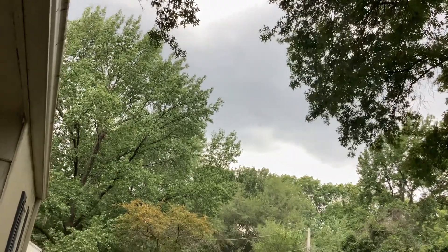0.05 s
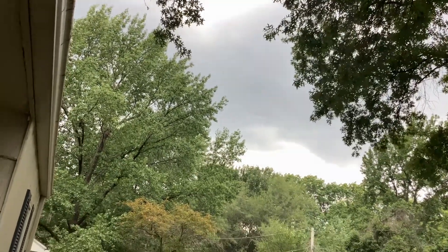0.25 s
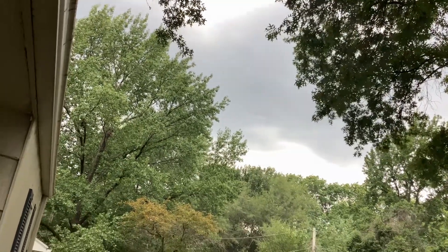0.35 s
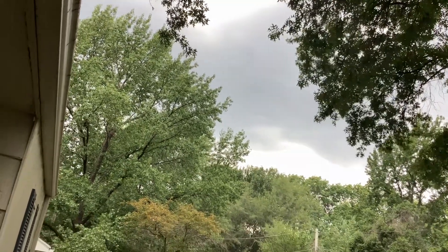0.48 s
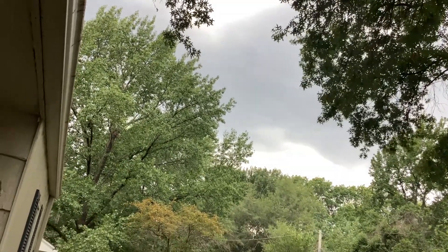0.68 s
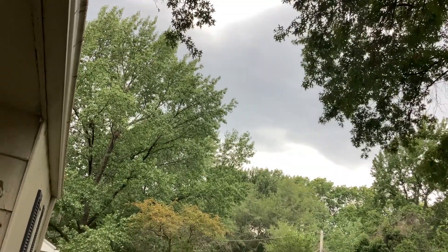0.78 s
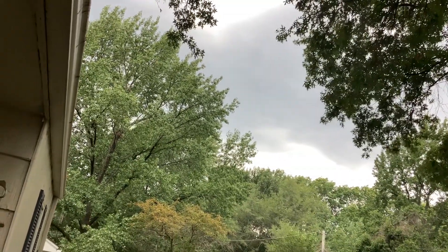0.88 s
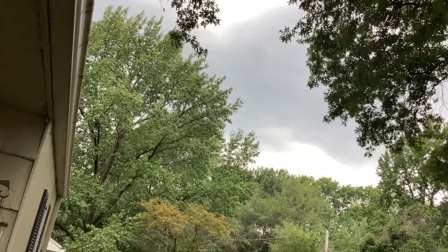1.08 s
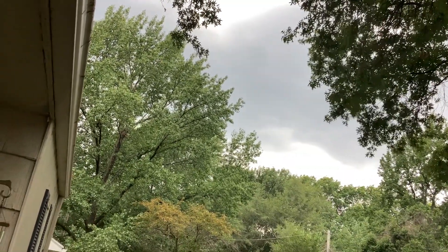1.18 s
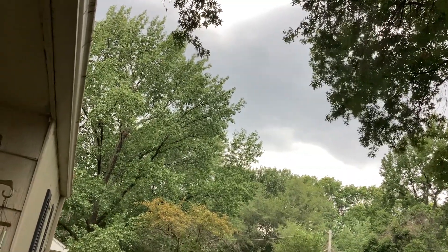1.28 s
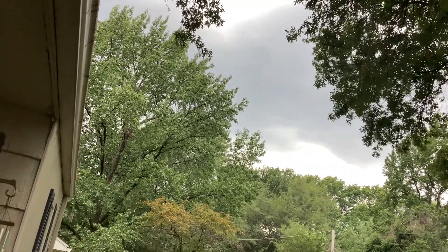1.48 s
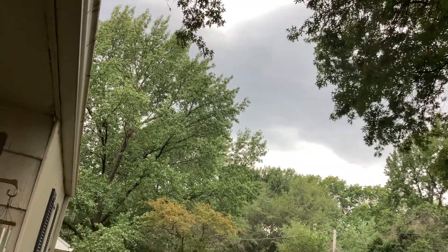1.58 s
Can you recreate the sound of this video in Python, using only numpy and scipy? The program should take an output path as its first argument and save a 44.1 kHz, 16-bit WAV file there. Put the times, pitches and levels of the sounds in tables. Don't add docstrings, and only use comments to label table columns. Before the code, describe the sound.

A hard dry snap close to the microphone over soft wind in leafy trees

```python
import sys
import numpy as np
from scipy import signal
from scipy.fft import rfft, irfft
from scipy.io import wavfile
from scipy.ndimage import uniform_filter1d

SR = 44100
rng = np.random.default_rng(int(sys.argv[2]) if len(sys.argv) > 2 else 0)


def nominal_scale(level):
    x = np.asarray(level, float) / 20
    return 10 ** x


def digitize_waveform(pressure):
    field = np.atleast_2d(pressure).T
    bounded = np.clip(field, -1, 1)
    quanta = np.round(bounded * 32767).astype(np.int16)
    wavfile.write(sys.argv[1], SR, quanta)


N = 70560
SNAP_S = .222


def evened(x):
    return x / np.sqrt(np.mean(x ** 2) + 1e-20)


def read(points, hz):
    f, value = np.transpose(points)
    return np.interp(np.log(hz + 1), np.log(f + 1), value)


def curve(points, column=1):
    rows = np.array(points, float)
    return np.interp(np.arange(N) / SR, rows[:, 0], rows[:, column])


def wander(hz):
    z = rfft(rng.standard_normal(N))
    lowpass = 1 + (np.fft.rfftfreq(N, 1 / SR) / hz) ** 4
    return evened(irfft(z / lowpass, N))


def fuzzy_line(hz, sway):
    return (sway * np.exp(2j * np.pi * hz * np.arange(N) / SR)).real


def colour(x, points):
    hz = np.fft.rfftfreq(N, 1 / SR)
    low_end, high_end = (points[0][0] * .7, -90), (points[-1][0] * 1.04, -90)
    ends = [low_end] + list(points) + [high_end]
    return evened(irfft(rfft(x) * nominal_scale(read(ends, hz)), N))


def patchy(patch_db, size):
    frames = N // 256 + 5
    a, b, p = rng.standard_normal((frames, 513, 3)).T
    p = uniform_filter1d(p, size, 0)
    p = evened(uniform_filter1d(p, 14, 1))
    z = (a + 1j * b) * nominal_scale(patch_db * p)
    return evened(signal.istft(z, nperseg=1024, noverlap=768)[1][:N])


# start_s [s], leaf_db [dB], rumble_db [dB]
WIND = [(0, -56, -59), (.1, -52, -50.5), (.19, -52.5, -49.5), (.37, -51.5, -49.5), (.55, -50.5, -51),
        (.8, -50.5, -48.5), (1.0, -51, -46), (1.15, -51, -48), (1.3, -50.5, -43.5), (1.6, -50, -51)]
# pitch_hz [Hz], level_db [dB per Hz]
RUMBLE_COLOUR = [(15, -73), (25, -52), (55, -3.5), (75, 2), (299, -10), (330, -10.5), (358, -11),
                 (442, -14.5), (700, -39), (910, -45), (1540, -120)]
# pitch_hz [Hz], width_hz [Hz], level_db [dB]
MACHINE_HUM = [(76.9, 22, -57), (121.3, 14, -58.5), (233.7, 26.5, -62.5), (300, 13, -65.5),
               (360.6, 9.7, -65), (530, 18, -97)]


def rumble():
    out = colour(patchy(patch_db=2.5, size=2), RUMBLE_COLOUR)
    lump_db = 1
    out = out * nominal_scale(lump_db * wander(27) - 1.5)
    for hz, width_hz, db in MACHINE_HUM:
        sway = wander(width_hz / 2) + 1j * wander(width_hz / 2)
        out = out + nominal_scale(db + 48) * fuzzy_line(hz, sway)
    return out * nominal_scale(curve(WIND, column=2))


# pitch_hz [Hz], level_db [dB per Hz]
AIR_COLOUR = [(4410, -32), (7500, -0.5), (7780, -6.5), (10200, -18), (11400, -24), (14900, -28.5)]


def air():
    level_db, start_db, rise_s = -15, -4.5, 0.45
    still_to_rise = np.clip(1 - np.arange(N) / SR / rise_s, 0, 1)
    return nominal_scale(level_db + start_db * still_to_rise) * colour(patchy(patch_db=2.2, size=20), AIR_COLOUR)


# pitch_hz [Hz], level_db [dB per Hz]
LEAF_COLOUR = [(300, -22), (500, -2), (1400, -2), (2700, -12.5), (3900, -6.5), (5150, -13), (5800, -19.5),
               (7200, -14)]


def leaves():
    rustles_per_s, spread_db, rustle_db = 2500, 4.5, -14.5
    hits = rng.random(N) < rustles_per_s / SR
    strength = nominal_scale(spread_db * np.minimum(rng.exponential(1, N), 3))
    taps = hits * rng.standard_normal(N) * strength
    drive = patchy(patch_db=0.5, size=12) + nominal_scale(rustle_db) * evened(taps)
    high_air = air()
    flicker_db = 0.31
    return (colour(drive, LEAF_COLOUR) + high_air) * nominal_scale(curve(WIND) + flicker_db * wander(25))


# start_s [s], strokes_so_far [count]
WING_STROKES = [(0, -.67), (.398, 17.0), (.823, 36.0), (1.005, 44.0), (1.3, 57.0), (1.6, 70.4)]


def insect():
    near_hz, drift_hz, near_db = 7360, 11, -62.8
    far_hz, far_db = 7110, -73.5
    sharpness, second_stroke, bend_rad, fuzz_depth = 1.6, .22, .4, .25
    angle = 2 * np.pi * curve(WING_STROKES)
    throb = np.exp(sharpness * (np.cos(angle) - 1))
    throb = throb + second_stroke * np.exp(-4.0 * (1 + np.cos(angle)))
    phase = 2 * np.pi * np.cumsum(near_hz + drift_hz * wander(4)) / SR
    phase = phase + bend_rad * np.sin(angle)
    fuzz = 1 + fuzz_depth * (wander(76) + 1j * wander(90))
    near = throb * (fuzz * np.exp(1j * phase)).real
    far = fuzzy_line(far_hz, wander(80) + 1j * wander(94))
    return nominal_scale(near_db) * evened(near) + nominal_scale(far_db) * far


# start_s [s], level_db [dB]
HALO_LEVEL = [(.2, -78), (0.211, -70), (0.212, -43), (0.222, -32.5), (0.221, -39.5), (0.2247, -32.5),
              (0.228, -72), (.235, -75), (0.237, -58), (.243, -91)]
# pitch_hz [Hz], level_db [dB]
HALO_COLOUR = [(300, 1.5), (700, 7), (1800, -4), (3500, -5), (7800, -2), (8800, -30)]


def snap_halo():
    level = [(0, -140), (.195, -140)] + HALO_LEVEL + [(.25, -140)]
    return colour(rng.standard_normal(N), HALO_COLOUR) * nominal_scale(curve(level))


# pitch_hz [Hz], level_db [dB], rise_s [s per 60 dB], fall_s [s per 60 dB]
NARROW_TONES = [(552, -35, .055, .04), (630, -41, .03, .03), (4700, -51, .06, .09), (6180, -41, .05, .035),
                (7700, -39, .05, .018), (14350, -55, .05, .01)]


def narrow_tones():
    t = np.arange(N) / SR
    out = np.zeros(N)
    for hz, db, rise_s, fall_s in NARROW_TONES:
        level_db = db - 60 * abs(t - SNAP_S) / np.where(t < SNAP_S, rise_s, fall_s)
        out = out + nominal_scale(level_db) * np.sin(2 * np.pi * hz * t + .6 * wander(hz / 60))
    return out


# pitch_hz [Hz], level_db [dB]
TICK_COLOUR = [(250, -130), (850, -28.5), (1900, -14), (3600, -14), (5200, -27), (9900, -37), (11800, -38),
               (14300, -46)]


def tick():
    size, port_hz, port_q = 1024, 5870, 2.25
    hz = np.fft.rfftfreq(size, 1 / SR)
    spectrum = nominal_scale(read([(20, -80)] + TICK_COLOUR + [(16000, -60)], hz))
    fold = irfft(np.log(spectrum)) * np.where(np.arange(size) < size // 2, 2, 0)
    u = 1j * hz / port_hz
    port = (1 - u / port_q + u * u) / (1 + u / port_q + u * u)
    whole = irfft(np.exp(rfft(fold) - fold[0] / 2) * port)
    return np.split(whole, 2)[0] / abs(whole).max()


# start_s [s], strength [amplitude, minus is upside down]
BLOWS = [
    (.221963, .143),
    (.222695, .892),
    (.223091, -.217),
    (.2238, .03),
]
# start_s [s], level_db [dB], top_hz [Hz]
FAINT_COPIES = [(.20136, -29, 15000), (.2065, -40, 5000), (.21203, -33, 15000), (.2168, -27, 5000),
                (.2277, -40, 5000), (.2341, -42, 6000), (.2383, -43, 5000), (.24403, -38, 15000)]


def snap():
    halo = snap_halo()
    rings = narrow_tones()
    hz = np.fft.rfftfreq(N, 1 / SR)
    train = 0
    for start_s, strength in BLOWS:
        train = train + strength * np.exp(-2j * np.pi * hz * start_s)
    for start_s, db, top_hz in FAINT_COPIES:
        train = train + nominal_scale(db) * np.exp(-2j * np.pi * hz * start_s - (hz / top_hz) ** 4)
    return halo + rings + irfft(train * rfft(tick(), N), N)


def duck(recover_s):
    start_s, fall_s = 0.224, 0.015
    t = np.arange(N) / SR - start_s
    return np.clip(np.minimum(t / fall_s, 1 - (t - fall_s) / recover_s), 0, 1)


def scene():
    high = (leaves() + insect()) * nominal_scale(-8.5 * duck(recover_s=0.19))
    low = rumble() * nominal_scale(-16 * duck(recover_s=0.21))
    return (high + low + snap())[None]


# start_s [s], length_s [s], top_hz [Hz]
TOP_GAPS = [(0.084, 0.028, 10300), (0.15, 0.051, 10700), (.44, 0.034, 10500), (1.036, 0.055, 8100),
            (1.44, .05, 10300), (.44, .09, 8900), (.7, .025, 8500), (.856, .05, 9500), (.975, .012, 11500),
            (1.157, .04, 10200), (1.134, 0.032, 8800), (1.2, 0.075, 8350), (1.286, .07, 8850),
            (1.42, .11, 8900)]


def top_band_gaps(x):
    from_hz, gap_db, raggedness, hole_rarity = 7620, -32, .3, 1.5
    hz, t, z = signal.stft(x, SR, nperseg=512, noverlap=384)
    rag = evened(uniform_filter1d(rng.standard_normal((len(TOP_GAPS), len(hz), 1)), 2, 1))
    edges = 1 + raggedness * np.clip(rag, -2, 1)
    lost = 0
    for (start_s, length_s, top_hz), edge in zip(TOP_GAPS, edges):
        band = ((hz > from_hz) & (hz < top_hz))[:, None]
        lost = lost + (band & (abs(t - start_s - length_s / 2) < edge * length_s / 2))
    specks = evened(uniform_filter1d(rng.standard_normal((len(hz), len(t))), 8, 1))
    away_from_snap = abs(t - SNAP_S) > .035
    lost = lost + (specks > hole_rarity) * (hz > from_hz)[:, None] * away_from_snap
    z = z * nominal_scale(gap_db * np.minimum(lost, 1))
    return signal.istft(z, SR, nperseg=512, noverlap=384)[1][:, :N]


def top_cut(x):
    return signal.sosfilt(signal.butter(12, 15030, fs=SR, output="sos"), x)


def record(dry):
    edge_hz = 14650
    x = signal.oaconvolve(dry, signal.firwin(121, edge_hz, fs=SR)[None], "same")
    return top_cut(top_band_gaps(x))


dry = scene()
out = record(dry)
digitize_waveform(out)
```